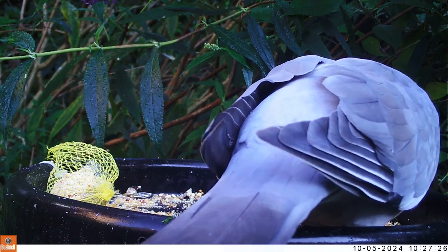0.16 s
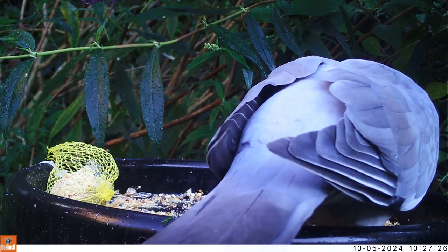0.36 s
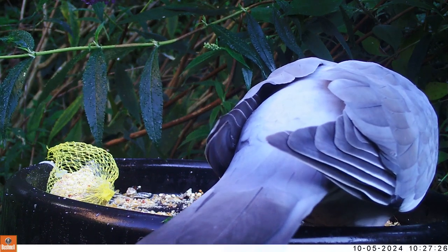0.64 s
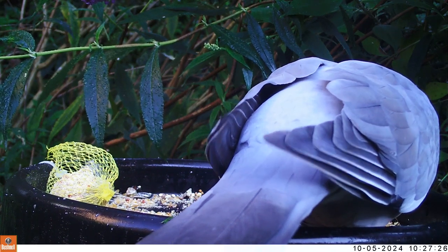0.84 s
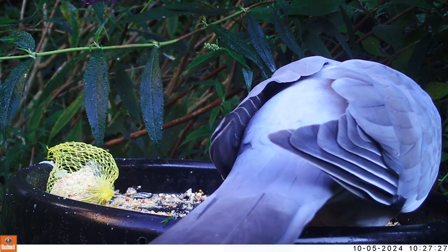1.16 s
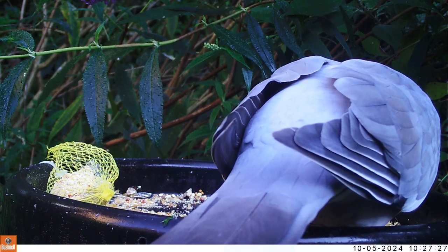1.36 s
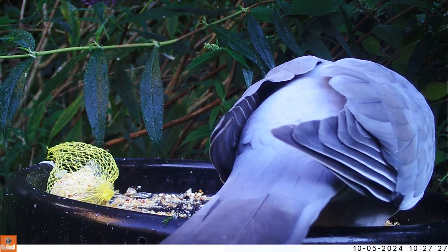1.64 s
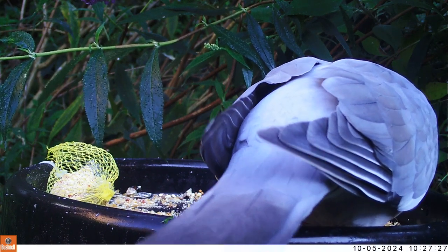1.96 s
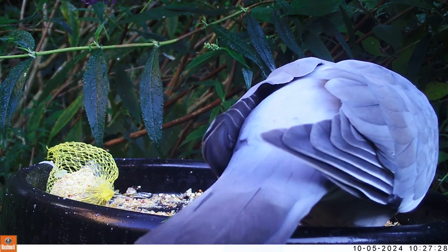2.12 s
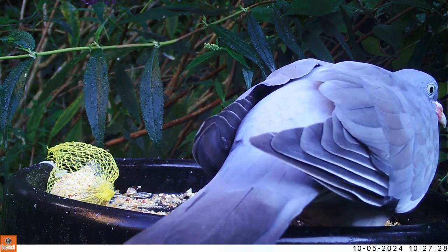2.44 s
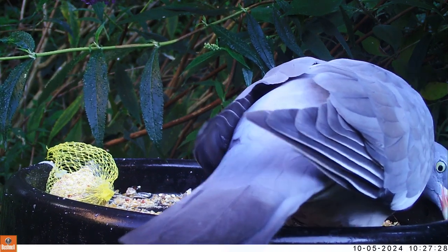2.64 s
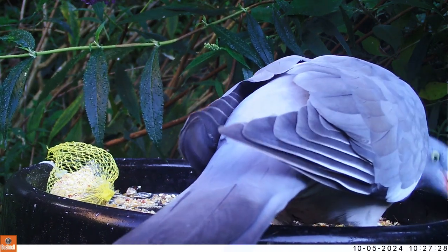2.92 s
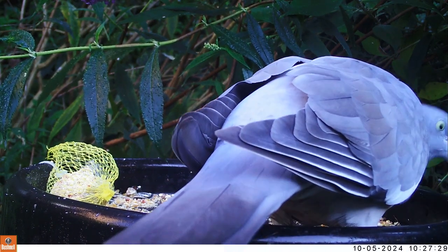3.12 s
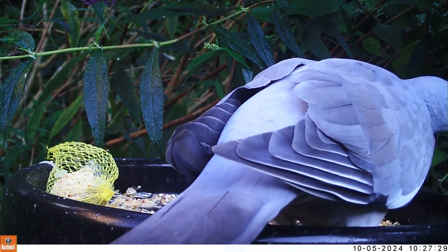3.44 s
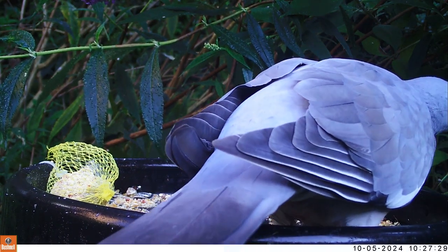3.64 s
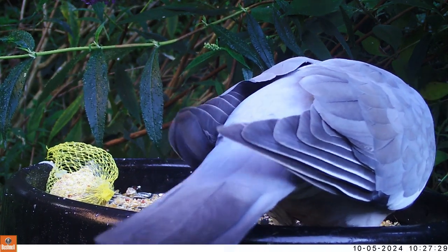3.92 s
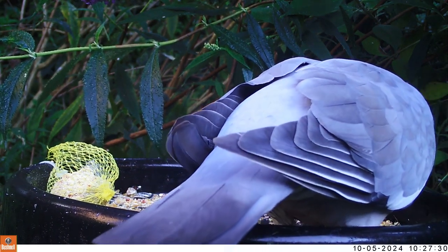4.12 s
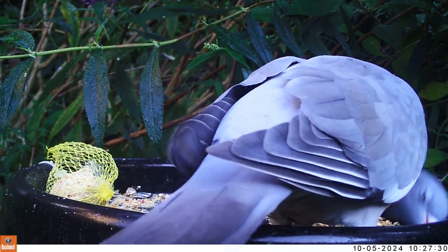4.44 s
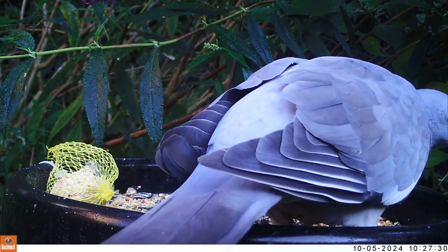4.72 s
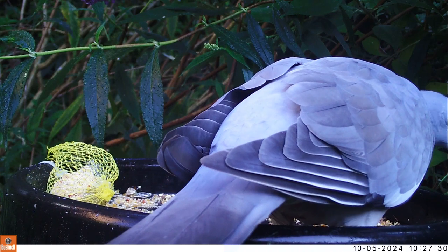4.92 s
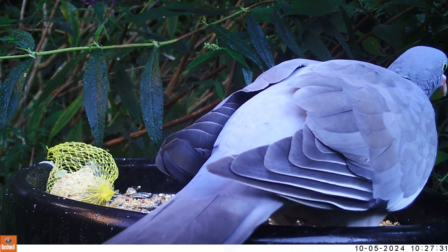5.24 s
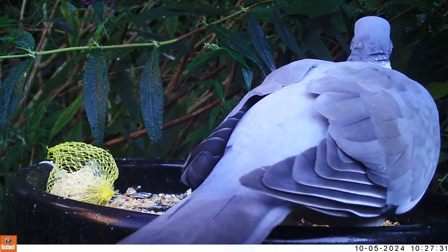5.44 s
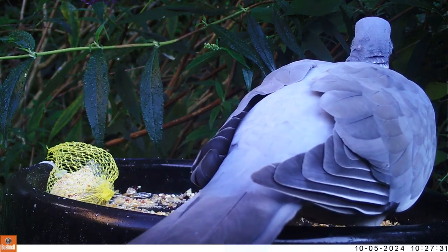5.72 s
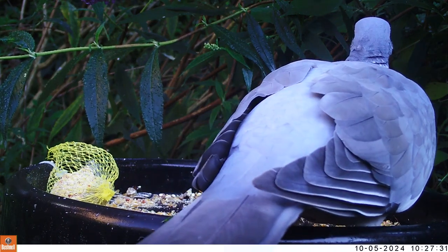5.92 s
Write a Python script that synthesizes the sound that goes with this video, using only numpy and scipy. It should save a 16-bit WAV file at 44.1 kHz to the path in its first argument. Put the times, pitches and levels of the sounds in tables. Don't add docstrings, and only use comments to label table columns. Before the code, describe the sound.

A steady deep rumble with soft hiss and a faint, low distant motor hum runs throughout six seconds, close to a garden feeder. A light beak tap on plastic comes at 0.3 s, a quick falling bird chirp at 0.8, and small scuffs and ticks from 1.1 to 1.3. Faint high rasps follow near 1.6 and 1.9. A quiet double tap at 2.04 leads to a steep falling chirp at 2.15, then fluttering song notes at 2.6. At 3.02 a hard, dry, very loud knock rings the dish, with scuffs around it, bird calls and tiny seed cracks until 3.3. Thin high notes and a lone scuff come around 3.8 to 4.1, faint calls and a tick around 4.3. A second equally loud knock hits at 4.64, followed by a clear level whistle at 4.83 and light taps to 5.1. Rumble continues, with one thin note at 5.84.

```python
import sys
import numpy as np
from scipy import signal
from scipy.fft import rfft, irfft
from scipy.io import wavfile
from scipy.ndimage import uniform_filter1d, minimum_filter1d

SR = 44100
rng = np.random.default_rng(int(sys.argv[2]) if len(sys.argv) > 2 else 0)


def invert_db(x):
    u = np.asarray(x, float) / 20
    return 10 ** u


def bounce(signal):
    frames = np.transpose(np.atleast_2d(signal))
    limited = np.clip(frames, -1, 1)
    pcm = np.round(limited * 32767).astype(np.int16)
    wavfile.write(sys.argv[1], SR, pcm)


N = 267642


def evened(x):
    return x / np.sqrt(np.mean(abs(x) ** 2) + 1e-20)


def add(mix, start_s, sound):
    part = mix[round(start_s * SR):][:len(sound)]
    part += sound[:len(part)]


# (frequency [Hz], density [dB per Hz])
HISS_COLOUR = [(1.5, -55), (4, -1), (25, -3.5), (45, -6.5), (90, -13), (145, -15.5), (170, -19), (400, -28),
               (1000, -38), (3300, -48), (3850, -46.5), (4600, -50), (8000, -52.5), (14000, -52.5)]


def microphone_hiss():
    hz = np.fft.rfftfreq(N, 1 / SR)
    colour_hz, colour_db = np.transpose(HISS_COLOUR)
    colour = np.interp(np.log(hz + 1), np.log(colour_hz + 1), colour_db)
    spectrum = rfft(rng.standard_normal(N)) * invert_db(colour)
    return invert_db(-33.5) * evened(irfft(spectrum, N))


# (shaft order [multiple of the turning rate], level [dB])
MOTOR_ORDERS = [(1, -40), (2, -45), (3, -56), (4, -60), (5, -57), (6, -59), (7, -67), (8, -67), (10, -64)]


def motor_hum():
    shaft_hz, drift_share = 29.44, 0.002
    drift = uniform_filter1d(rng.standard_normal(N), 30000)
    drift = evened(uniform_filter1d(drift, 30000))
    turns = np.cumsum(shaft_hz * (1 + drift_share * drift)) / SR
    return sum(np.sqrt(2) * invert_db(db) * np.sin(2 * np.pi * order * turns) for order, db in MOTOR_ORDERS)


def far_whistle(smear_hz, clear, points):
    time_s, pitch_hz, level_db = np.transpose(points)
    t = np.arange(time_s[0], time_s[-1], 1 / SR)
    echoes = rng.standard_normal((len(t) + 2000, 2)) @ [1, 1j]
    soft = signal.butter(3, smear_hz / 2, fs=SR)
    echoes = evened(signal.lfilter(*soft, echoes)[2000:])
    tone = np.exp(2j * np.pi * np.cumsum(np.interp(t, time_s, pitch_hz)) / SR)
    tone *= np.sqrt(clear) + np.sqrt(1 - clear) * echoes
    fade = signal.windows.tukey(len(t), min(0.4, 0.03 / (time_s[-1] - time_s[0])))
    return np.sqrt(2) * tone.real * invert_db(np.interp(t, time_s, level_db)) * fade


def sing(mix, notes, smear_hz, clear, swell_db, fall_db_s):
    knee_db, gone_db, longest_s = 16, 16, 1.0
    far_fall = 0.54 * fall_db_s
    for start, length, first_hz, last_hz, db in notes:
        end = start + length
        knee = end + knee_db / fall_db_s
        gone = min(knee + gone_db / far_fall, start + longest_s)
        last_db = db - knee_db - (gone - knee) * far_fall
        points = [(start, first_hz, db - swell_db), (end, last_hz, db),
                  (knee, last_hz, db - knee_db), (gone, last_hz, last_db)]
        add(mix, start, far_whistle(smear_hz, clear, points))


# (start [s], sung length [s], first pitch [Hz], last pitch [Hz], top level [dB])
SEEP_NOTES = [(1.37, .22, 5310, 5310, -70), (2.19, 0.065, 5360, 5360, -68), (3.79, 0.14, 7790, 7730, -62),
              (3.95, 0.1, 7840, 7890, -61), (4.095, .17, 7490, 7460, -63.5), (4.49, .14, 7150, 7050, -56.5),
              (4.68, 0.058, 7670, 7700, -64), (5.84, 0.18, 5490, 5490, -65)]


def seeping_birds(mix):
    sing(mix, SEEP_NOTES, smear_hz=110, clear=0.5, swell_db=4.5, fall_db_s=110)


# (start [s], sung length [s], first pitch [Hz], last pitch [Hz], top level [dB])
RASP_NOTES = [
    (1.6, 0.023, 6950, 7100, -57.5),
    (1.937, 0.027, 7000, 7170, -60),
    (2.57, .08, 4500, 4200, -56),
    (3.19, 0.071, 3680, 3600, -56.5),
]


def rasping_birds(mix):
    sing(mix, RASP_NOTES, smear_hz=1500, clear=0.01, swell_db=6.7, fall_db_s=86)


# (start [s], sung length [s], first pitch [Hz], last pitch [Hz], top level [dB])
CHURR_NOTES = [
    (3.17, 0.05, 3950, 3940, -51.5),
    (3.77, 0.069, 3790, 3800, -63),
    (4.25, .05, 4200, 4000, -63),
    (4.41, 0.0905, 3900, 3760, -59.5),
]


def churring_birds(mix):
    sing(mix, CHURR_NOTES, smear_hz=460, clear=0.01, swell_db=2.4, fall_db_s=75)


# (start [s], sung length [s], first pitch [Hz], last pitch [Hz], top level [dB])
TRILL_NOTES = [(.43, .06, 3750, 3750, -68), (.55, .05, 4320, 4250, -71), (2.48, .04, 3880, 3880, -66),
               (2.6, .04, 4650, 4550, -58), (2.605, .1, 3640, 3634, -49), (2.63, .07, 4000, 3900, -51),
               (2.67, .04, 2880, 2900, -60), (3.174, .11, 4180, 4165, -55), (4.415, .1, 3660, 3780, -60),
               (4.84, 0.109, 4010, 3950, -46)]


def trilling_birds(mix):
    sing(mix, TRILL_NOTES, smear_hz=176, clear=0.13, swell_db=4, fall_db_s=65)


# (start [s], sung length [s], first pitch [Hz], last pitch [Hz], top level [dB])
CHIRP_NOTES = [
    (.794, 0.019, 4780, 4180, -51.5),
    (.826, 0.011, 3900, 3820, -54),
    (2.155, .062, 5700, 3640, -53.5),
    (4.372, 0.053, 4650, 4200, -59),
]


def chirping_birds(mix):
    sing(mix, CHIRP_NOTES, smear_hz=250, clear=0.3, swell_db=11, fall_db_s=590)


# (start [s], sung length [s], first pitch [Hz], last pitch [Hz], top level [dB])
PIPE_NOTES = [
    (3.14, 0.069, 3970, 4120, -49),
    (4.83, 0.15, 3900, 3876, -38),
]


def piping_birds(mix):
    sing(mix, PIPE_NOTES, smear_hz=102, clear=0.46, swell_db=17, fall_db_s=95)


# (start [s], length [s], first pitch [Hz], last pitch [Hz], top level [dB])
SEED_STIRS = [
    (1.097, .02, 3950, 3700, -61),
    (2.045, 0.028, 3800, 3750, -64),
    (3.022, 0.014, 3800, 3850, -50),
    (4.59, 0.043, 4150, 4010, -57),
]


def seed_stirs(mix):
    sing(mix, SEED_STIRS, smear_hz=280, clear=0.01, swell_db=3, fall_db_s=210)


def ring(t, modes, rise_s):
    t = np.maximum(t, 0)
    sines = sum(invert_db(db) * np.exp(-np.pi * width * t) * np.sin(2 * np.pi * hz * t) for hz, width, db in modes)
    return sines * (1 - np.exp(-t / rise_s))


def scatter(t, gap_s, t60, long_db, long_t60):
    decay = invert_db(-60 * t / t60) + invert_db(long_db - 60 * t / long_t60)
    taps = rng.standard_normal(len(t)) * decay * (t > gap_s)
    return taps / np.linalg.norm(taps)


# (delay [ms], body gain [x], treble gain [x])
PORT_PATHS = [(0, .4, 1.1), (1.05, .6, .4), (1.314, .75, .15), (2.1, .3, .2), (2.89, .45, .45)]
# (frequency [Hz], width [Hz], level [dB])
DISH_MODES = [(980, 430, -22), (1760, 110, -20), (2360, 320, -17), (2725, 440, -1.5), (3310, 470, 0),
              (4170, 145, -15), (4870, 220, -11), (5450, 160, -18)]
# (frequency [Hz], width [Hz], level [dB])
TREBLE_MODES = [(7400, 3500, 8.5), (10030, 2140, 5.5), (11000, 1150, -7)]


def peck(mix, contacts, scatter_db):
    t = np.arange(6000) / SR
    band = np.vstack([signal.butter(2, 1100, "high", fs=SR, output="sos"),
                      signal.butter(8, 12700, fs=SR, output="sos")])
    for time_s, db, treble_db, ring_hz, dish_db in contacts:
        modes = [(hz, width, level + dish_db) for hz, width, level in DISH_MODES]
        modes.append((ring_hz, 400, 0))
        crunch = rng.standard_normal(60) * np.exp(-t[:60] / 0.00084)
        body = sum(low * ring(t - ms / 1000, modes, 0.0001) for ms, low, high in PORT_PATHS)
        treble = sum(high * ring(t - ms / 1000, TREBLE_MODES, 0.00005) for ms, low, high in PORT_PATHS)
        treble = np.convolve(treble, crunch)[:len(t)]
        lift = invert_db(treble_db + 13)
        direct = body / abs(body).max() + lift * treble / abs(treble).max()
        tick = ring(t, modes, 0.00037) + 0.82 * lift * ring(t, TREBLE_MODES, 0.00005)
        echoes = scatter(t, gap_s=0.004, t60=0.022, long_db=-30, long_t60=0.23)
        near = signal.fftconvolve(tick, echoes)[:len(t)]
        sound = signal.sosfilt(band, direct + invert_db(scatter_db + 11) * near)
        add(mix, time_s - 0.0001, invert_db(db) * sound)


# (time [s], peak level [dB], treble [dB], ring [Hz], dish level [dB])
SEED_CRACKS = [
    (2.0454, -48, -14, 6080, -8),
    (3.2123, -47.5, -6.5, 5810, -4),
    (3.274, -39.5, -14.5, 5800, 1),
    (5.0187, -53.5, 0, 5840, -6),
]


def seed_cracks(mix):
    peck(mix, SEED_CRACKS, scatter_db=-11)


# (time [s], peak level [dB], treble [dB], ring [Hz], dish level [dB])
BEAK_SCUFFS = [
    (1.0939, -36, -24, 3980, -10),
    (2.958, -28.5, -36, 3740, -3),
    (3.07, -33.5, -32, 3850, -7),
    (3.977, -34, -27, 3820, -14),
    (4.57, -35, -20, 3800, -3),
    (4.579, -29, -26, 3790, -14),
]


def beak_scuffs(mix):
    peck(mix, BEAK_SCUFFS, scatter_db=-5)


# (time [s], peak level [dB], treble [dB], ring [Hz], dish level [dB])
BEAK_TAPS = [(0.272, -39, -25, 3860, -3), (1.122, -47, -20, 3990, -10), (1.288, -45, -17, 3400, -5),
             (2.0394, -35, -27, 3800, -14), (2.045, -35, -27, 3950, -22), (2.0991, -43.5, -17, 3730, -5),
             (3.0216, -2.5, -20.5, 3910, -6.5), (4.3026, -43, -19, 4000, -3), (4.6354, -2, -22, 3800, -5),
             (4.68, -37, -20, 3870, -3), (4.8277, -34, -16.5, 3600, -10), (5.057, -34, -25, 3860, -13),
             (5.0746, -35, -27, 3880, -9)]


def beak_taps(mix):
    peck(mix, BEAK_TAPS, scatter_db=-12.5)


def scene():
    mix = microphone_hiss() + motor_hum()
    for birds in [seeping_birds, rasping_birds, churring_birds, trilling_birds, chirping_birds, piping_birds]:
        birds(mix)
    for pigeon in [seed_stirs, seed_cracks, beak_scuffs, beak_taps]:
        pigeon(mix)
    return mix[None]


# (frequency [Hz], threshold against the usual level [dB])
WEAK_BANDS = [(5000, -9), (8000, -5), (10500, -3.3), (13500, -2.4)]


def thinned(x):
    mask_db, mask_bins = -30, 26
    hz, _, z = signal.stft(x, SR, "cosine", nperseg=2048)
    power = uniform_filter1d(abs(z) ** 2, size=7, axis=0)
    usual = np.median(power, axis=1, keepdims=True)
    threshold_db = np.interp(hz, *np.transpose(WEAK_BANDS))[:, None]
    weak = power < usual * invert_db(2 * threshold_db)
    below = np.roll(power, mask_bins, axis=0)
    below = -minimum_filter1d(-below, size=15, axis=0)
    hidden = (power < below * invert_db(2 * mask_db)) & (hz[:, None] > 3000)
    return signal.istft(z * ~(weak | hidden), SR, "cosine", nperseg=2048)[1][:N]


def top_cut(x):
    return signal.sosfilt(signal.butter(12, 14050, fs=SR, output="sos"), x)


def record(dry):
    edge = signal.firwin(255, 13880, window=("kaiser", 9), fs=SR)
    band = signal.oaconvolve(thinned(dry[0]), edge, "same")
    return top_cut(band[None])


dry = scene()
out = record(dry)
bounce(out)
```